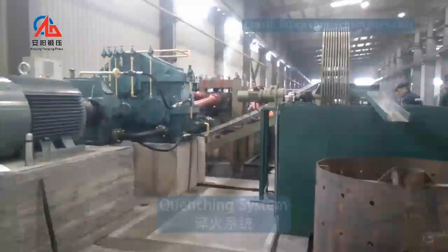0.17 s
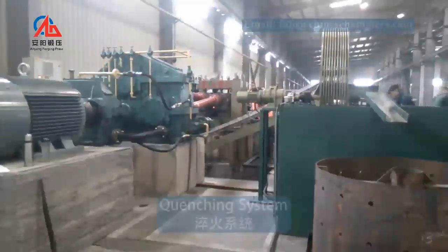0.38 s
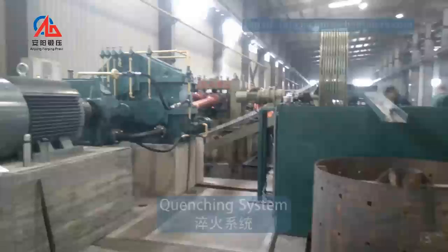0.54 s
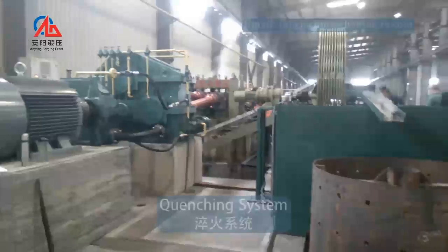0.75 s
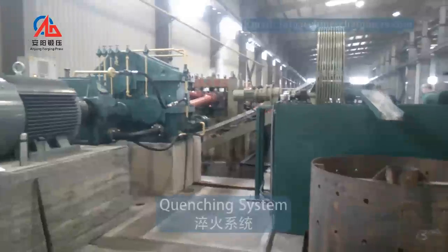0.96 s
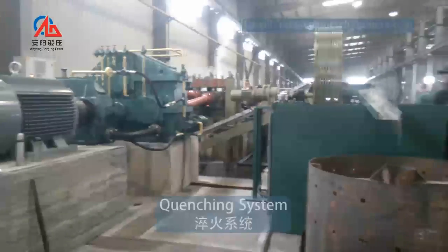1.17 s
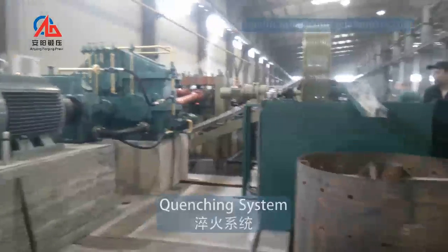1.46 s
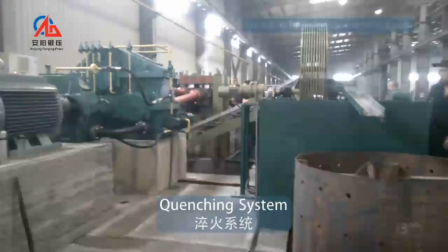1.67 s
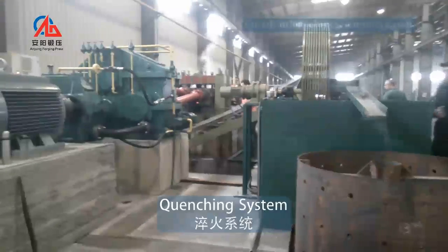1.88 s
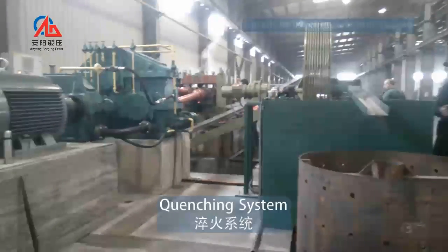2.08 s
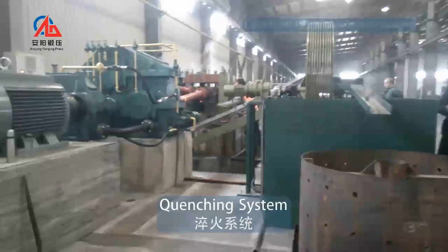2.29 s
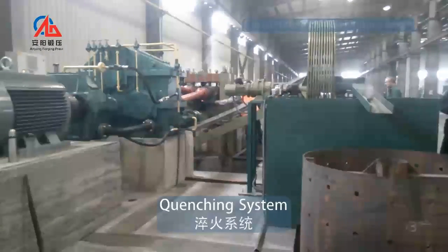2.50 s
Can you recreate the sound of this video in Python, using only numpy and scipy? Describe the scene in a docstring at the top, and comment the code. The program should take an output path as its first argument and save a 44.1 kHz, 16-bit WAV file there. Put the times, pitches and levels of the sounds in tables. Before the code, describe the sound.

Hard steel pieces clank and rattle in a sheet-metal chute, dense at first, sparser mid-way, then busy again, over constant motor and gearbox drone and recurring roller rumble in a big hall; the microphone's level ducks under loud hits.

```python
"""A big factory hall with a rolling mill: motors and gearbox drone, the rolls rumble about every 0.8 s.
Steel pieces clank and rattle in the chutes, whose wall bangs; a larger steel part rings near 960 Hz.
Drone, rumble and thumps are shaped noise, with singing tones for the frame of the rolls; each clank
is a noise crack, scattered partials of sheet steel and struck modes.
A gain control ducks the whole mix under every loud clank, and the level dips once, briefly."""
import sys
import numpy as np
from scipy import signal
from scipy.fft import rfft, irfft, next_fast_len
from scipy.io import wavfile
from scipy.ndimage import uniform_filter1d, minimum_filter1d, map_coordinates

SR = 44100
rng = np.random.default_rng(int(sys.argv[2]) if len(sys.argv) > 2 else 0)


def file_out(sig):
    """Save sig as 16-bit WAV at sys.argv[1]."""
    # one column per channel
    cols = np.atleast_2d(sig).T
    # limit, then scale
    lim = np.clip(cols, -1, 1)
    pcm = np.round(lim * 32767).astype(np.int16)
    wavfile.write(sys.argv[1], SR, pcm)


N = 116865  # length in samples

# Colour of the motor and gearbox drone. Each row: frequency in Hz, relative level in dB per Hz.
DRONE_COLOUR = [(25, -4), (45, -5), (85, -6.5), (112, -7), (145, 2.5), (190, -6.5), (240, 6), (330, 9),
                (480, 2), (750, 2), (1100, -1.5), (1500, -15), (3000, -30.5), (6000, -56)]
# Steady lines of the drive, under the swell. Each row: frequency in Hz, level in dB.
DRIVE_LINES = [(112, -54.5), (140, -55), (283, -57.5), (361, -56), (748, -57), (960, -47), (2783, -57)]
# Colour of the hall's far clatter and hiss. Each row: frequency in Hz, relative level in dB per Hz.
HALL_COLOUR = [(500, -37.5), (1500, 10.5), (2600, 11), (3400, 5.5), (4300, 5), (4850, 9.5), (5600, 3.5),
               (7000, 0.5), (9700, -4.5)]
# Slow swell of everything in the drive. Each row: time in seconds, gain in dB.
SWELL_CURVE = [(0, 7), (.45, 2), (0.849, 7), (1.151, 2.5), (1.322, 2), (1.44, -1.5), (1.652, 12.5),
               (1.95, 2), (2.298, -0.5), (2.65, 2)]
# Roll strokes and the weaker shudders between them.
# Each row: start in seconds, level in dB, hold in seconds, pitch of the frame in Hz.
ROLL_STROKES = [(-.15, -31.5, 0.33, 260), (0.688, -23, 0.23, 300.9), (1.029, -30, 0.047, 350),
                (1.511, -24, 0.26, 288.3), (2.003, -32, 0.03, 423), (2.309, -27, 0.29, 282)]
# Colour of a stroke's body. Each row: frequency in Hz, relative level in dB per Hz.
RUMBLE_COLOUR = [(100, -37.5), (190, -23), (230, -6.5), (350, -3.5), (490, -11), (620, -9), (790, -6),
                 (1050, -22), (1400, -23), (3000, -59)]
# Steel pieces landing. Each row: start in seconds, crash level in dB, ring level in dB, treble tilt in dB,
# rise in seconds, main pitch of the piece in Hz, its second mode in Hz.
LANDINGS = [(0, -33.5, -25, 12, 0.036, 4850, 6000), (0.0759, -13, -19, 5.5, 0.0005, 4700, 1493),
            (0.102, -32, -16, -5, .005, 6130, 5570), (.135, -22.5, -21, -9, 0.0069, 4640, 4336),
            (.163, -36.5, -23, 12.5, 0.008, 5400, 5270), (.191, -25.5, -17, -8.5, 0.0021, 4820, 3649),
            (.241, -26.5, -32, -5, .008, 4340, 3652), (0.289, -35.5, -35, 17, 0.028, 4470, 2621),
            (0.316, -22.5, -20, -11.5, 0.0087, 4785, 3641), (.435, -17, -6.5, 4, 0.019, 4847, 3649),
            (.483, -21, -22, -7, 0.011, 4791, 3655), (0.542, -21.5, -21, 1.5, 0.024, 4160, 5062),
            (0.678, -54.5, -29, -11.5, 0.0085, 4270, 2600), (.776, -48, -34, 4, 0.0093, 4950, 4800),
            (1.117, -30.5, -31, -4, 0.011, 4740, 4793), (1.198, -25.5, -29, 0.5, .012, 4769, 4901),
            (1.244, -35, -30, 0, 0.016, 4780, 1507), (1.462, -41, -29.5, 0.5, 0.024, 4766, 4620),
            (1.485, -16.5, -15, 3.5, 0.0011, 4880, 5307), (1.513, -27.5, -24.5, 0, 0.013, 5213, 5307),
            (1.634, -26.5, -22.5, -1, 0.013, 6140, 2312), (1.677, -31, -24, 0, 0.0036, 4770, 4993),
            (1.742, -23.5, -20.5, 10, 0.0044, 5330, 4850), (1.785, -29.5, -19, -2.5, 0.022, 4860, 3924),
            (1.85, -37, -34.5, -1.5, 0.0075, 5110, 2600), (1.972, -20, -14.5, 1.5, .01, 4800, 4137),
            (2.015, -26, -28.5, -14.5, 0.0091, 2456, 1660), (2.059, -29, -25.5, -2.5, 0.018, 4980, 4783),
            (2.156, -16.5, -15, 8, 0.0051, 4720, 5547), (2.178, -18.5, -23, -2, 0.0067, 4680, 4710),
            (2.209, -31, -23, -10, 0.0076, 4960, 5170), (2.25, -28.5, -41, -3, 0.0029, 4380, 5649),
            (2.529, -33.5, -38, -4, 0.013, 4830, 3650)]
# Colour of the chute's crash. Each row: frequency in Hz, relative level in dB per Hz.
CRASH_COLOUR = [(80, -50), (250, -51.5), (700, -4.5), (1100, -2), (1700, 4.5), (2100, 0), (2550, 3),
                (3050, -1), (3700, 2.5), (4400, 2.5), (5300, 0), (6300, -1), (7200, -9.5), (9700, -13)]
# Extra colour of the crack, over that of the crash. Each row: frequency in Hz, relative gain in dB.
CRACK_COLOUR = [(600, 11.5), (1500, 4.5), (2600, -9), (5000, 1.5)]
# Struck modes of the chute. Each row: frequency in Hz, relative level in dB.
CHUTE_MODES = [(1663, 9), (1790, -1), (2330, 4), (2460, -4.5), (2600, -0.5), (2783, 4.5), (3460, 0),
               (3651, 3.5), (4120, 10), (4419, 9.5), (5307, 4.5), (5546, -7), (5892, -1.5), (6654, -7)]
# Modes of a steel piece. Each row: ratio to its main pitch, relative level in dB.
PIECE_MODES = [(.978, -12), (1, 0), (1.021, -12), (1.04, -10), (1.1, -15)]
# Bangs of the chute's wall. Each row: start in seconds, level in dB, pitch in Hz.
WALL_BANGS = [(.076, -11, 1450), (1.4855, -19, 1790)]
# Dull thumps of the gearbox. Each row: start in seconds, level in dB.
GEARBOX_THUMPS = [(0.371, -52), (0.675, -36.5), (.985, -30), (1.069, -32), (1.141, -34.5), (1.588, -33),
                  (1.691, -33), (1.819, -37), (2.372, -38), (2.44, -31)]
# Colour of a thump's body. Each row: frequency in Hz, relative level in dB per Hz.
THUMP_COLOUR = [(25, -2), (70, -10.5), (130, 3.5), (180, -0.5), (300, -0.5), (800, -51)]
# Tolls of the large part. Each row: start in seconds, level in dB, attack in seconds,
# T60 in seconds, chatter from 0 to 1.
TOLL_STRIKES = [(.427, -24, 0.0022, 2.01, 0.47), (.53, -22.5, 0.029, 0.15, 1),
                (0.634, -30.5, 0.009, 0.39, 1), (0.959, -21.5, 0.041, 0.16, 0.25),
                (2.1459, -27.5, 0.0016, 0.29, .2), (2.205, -24, 0.0052, 0.81, 1)]
# Other modes of the large part, stirred by chatter. Each row: frequency in Hz, relative level in dB.
CHATTER_MODES = [(897, -7), (950, 2.5), (972, 6.5), (1015, 1.5), (1080, -10.5)]
# Left-right likeness of the noise. Each row: frequency in Hz, coherence.
COHERENCE = [(50, 0.94), (130, 0.99), (280, 0.9), (550, 0.64), (1100, 0.09), (2300, 0.013), (4800, 0.31),
             (9000, .05)]
# Stereo balance of the whole mix. Each row: frequency in Hz, left over right in dB.
STEREO_BALANCE = [(50, -1.5), (140, 3), (350, 2.5), (700, 3), (1000, 5), (1600, 6), (2600, 0.5), (3700, -2),
                  (4800, -6), (5600, 2.5), (6500, -1.5), (8000, 12.5), (9500, 11)]

DRONE_DB, HALL_DB = -35.5, -40.5  # under the swell
SURGE_DB, HALL_PATCHY_DB = 1.3, 5.5  # depths of random level changes
STROKE_ATTACK_S, STROKE_T60_S = 0.0055, 0.34
FRAME_DB, FRAME_UPPER_DB, FRAME_UPPER_HZ = -2, -7.5, 361  # upper tone relative to the lower
FRAME_BUILD_S, FRAME_WANDER_RAD = 0.083, .9
CRACK_DB, CRACK_T60_S, CRASH_T60_S = 2, 0.047, 0.35
CHUTE_DB, CHUTE_T60_S = -12, 0.47
PIECE_T60_S, SECOND_MODE_DB, PIECE_ECHO_DB = .22, -4, -4
ECHO_DB, ECHO_T60_S = -7, 0.57
RATTLE_DB, CLATTER_PATCHY_DB = 1.1, 3.8  # depths of random level changes
UNEVEN_DB, UNEVEN_SPACING_HZ = 4, 130  # random bumps in the crash colour
PARTIAL_SPACING_HZ, PARTIAL_SHARE = 90, .75  # mean spacing; share of power
MODE_WIDTH_HZ, MODE_SCATTER_DB, DETUNE_RATIO = 30, 2.5, .001
SLAM_T60_S, SLAM_WIDTH_HZ = 0.057, 170
THUMP_RISE_S = 0.0086
TOLL_HZ, TOLL_WANDER_RAD, FLUTTER_DB = 961, .55, 2.3
LEFT_LEAD_S = 0.00018
LIMIT_DB, GAIN_ATTACK_S, RECOVER_DB_PER_S = -24, 0.0018, 159.5
SETTLE_S, OVERSHOOT_DB = .006, 1.8
DIP_START_S, DIP_END_S, DIP_DB = .612, .631, -12.5
TOP_HZ = 9800


def amp(db):
    """Decibels to gain."""
    return 10 ** (np.asarray(db) / 20)


def unit(x):
    """Scale to rms 1."""
    return x / np.sqrt(np.mean(x ** 2) + 1e-20)


def along(points, hz):
    """Read (Hz, value) points on a log frequency axis."""
    f, v = np.transpose(points)
    return np.interp(np.log(hz + 1), np.log(f + 1), v)


def since(start):
    """Seconds after a moment, zero before it."""
    return np.maximum(np.arange(N) / SR - start, 0)


def fade(t, t60):
    """Exponential decay by 60 dB in t60 seconds."""
    return np.exp(-np.log(1000) * t / t60)


def chance(position):
    """A smooth random curve with one knot per unit of position."""
    return map_coordinates(rng.standard_normal(2048), [position], mode="wrap")


def wobble(rate):
    """A smooth random curve in time, rate knots a second."""
    return chance(np.arange(N) * rate / SR)


def filtered(x, response):
    """Shape x by a response of frequency."""
    m = next_fast_len(N + 8192)  # padding keeps the end from wrapping onto the start
    hz = np.fft.rfftfreq(m, 1 / SR)
    return irfft(rfft(x, m) * response(hz), m)[..., :N]


def diffuse(response, size=N):
    """Stereo noise of rms 1 with a given response; mid and side are mixed to set the coherence."""
    m = next_fast_len(size, real=True)
    hz = np.fft.rfftfreq(m, 1 / SR)
    turn = np.arccos(np.clip(along(COHERENCE, hz), -1, 1)) / 2
    spectra = rfft(rng.standard_normal((2, m))) * response(hz)
    mid, side = irfft(spectra * [np.cos(turn), np.sin(turn)], m)[:, :size]
    return unit(np.array([mid + side, mid - side]))


def rush(spectrum):
    """Broad noise with a given colour."""
    return diffuse(lambda hz: amp(along(spectrum, hz)))


def resonances(modes, width_hz, size=N):
    """Narrow modes kept ringing by random excitation."""
    def peaks(hz):
        return sum(amp(db) / (1 + ((hz - f) / width_hz) ** 2) for f, db in modes)
    return diffuse(peaks, size)


def tone(hz, wander):
    """A resonance kept singing, its phase and strength drifting."""
    # a drift shared by both channels, plus a smaller one of each channel's own
    drift = wander * wobble(25.03) + 0.21 * np.array([wobble(6.8), wobble(25)])
    return unit(amp(FLUTTER_DB * wobble(40)) * np.sin(2 * np.pi * hz * since(0) + drift))


def patchy(x, depth_db):
    """Short random emphases of narrow bands, like many far-off rings."""
    z = signal.stft(x, nperseg=512)[2]
    field = rng.standard_normal(z.shape[1:])
    field = uniform_filter1d(field, size=2, axis=0)  # over neighbouring bands
    field = uniform_filter1d(field, size=10, axis=1)  # over time
    return unit(signal.istft(z * amp(depth_db * unit(field)), nperseg=512)[1][:, :N])


def drive():
    """Motors and gearbox drone as surging noise with wavering lines, over the patchy hiss of the hall."""
    drone = amp(DRONE_DB + SURGE_DB * wobble(15)) * rush(DRONE_COLOUR)
    hum_level = np.linalg.norm([amp(db) for hz, db in DRIVE_LINES])
    hum = hum_level * resonances(DRIVE_LINES, width_hz=2.4)
    hall = amp(HALL_DB + 0.16 * wobble(71)) * patchy(rush(HALL_COLOUR), HALL_PATCHY_DB)
    swell = amp(np.interp(since(0), *np.transpose(SWELL_CURVE)))
    return swell * (drone + hum + hall)


def rolls():
    """Each stroke swells, holds and dies away; two frame resonances build up under it into a growl."""
    out = np.zeros((2, N))
    for start, db, hold, hz in ROLL_STROKES:
        upper = amp(FRAME_UPPER_DB) * tone(FRAME_UPPER_HZ, FRAME_WANDER_RAD)
        frame = tone(hz, FRAME_WANDER_RAD) + upper
        frame *= np.minimum(since(start) / FRAME_BUILD_S, 1)
        attack = np.minimum(since(start) / STROKE_ATTACK_S, 1)
        shape = attack * fade(since(start + hold), STROKE_T60_S)
        level = amp(db + SURGE_DB * wobble(90))
        out += level * shape * (rush(RUMBLE_COLOUR) + amp(FRAME_DB) * frame)
    return out


def ring(modes, t):
    """Modes struck once, each at a fresh strength and with a different phase in the two channels."""
    out = np.zeros((2, len(t)))
    for hz, db in modes:
        phase = rng.uniform(0, 2 * np.pi) + rng.normal(0, 0.96, (2, 1))
        level = amp(db + rng.normal(0, MODE_SCATTER_DB))
        out += level * np.sin(2 * np.pi * hz * rng.normal(1, DETUNE_RATIO) * t + phase)
    return unit(out)


def plate(colour, size):
    """Sheet steel: many scattered partials of a given colour, with some noise between them."""
    def scattered(hz):
        return colour(hz) * (rng.random(len(hz)) < hz[1] / PARTIAL_SPACING_HZ)
    partials = diffuse(scattered, size)
    return np.sqrt(PARTIAL_SHARE) * partials + np.sqrt(1 - PARTIAL_SHARE) * diffuse(colour, size)


def clanks():
    """Each landing cracks in both channels alike, rings the piece and stirs the chute into uneven clatter."""
    out = np.zeros((2, 2, N + SR))  # blows and clatter, each in stereo
    size = 24000  # samples per landing
    t = np.arange(size) / SR
    echo = amp(ECHO_DB) * fade(t, ECHO_T60_S)
    crash_decay = np.hypot(fade(t, CRASH_T60_S), echo)
    for start, crash_db, ring_db, bright_db, rise, pitch, second_hz in LANDINGS:
        def colour(hz):
            tilt_db = along([(3500, 0), (6500, bright_db)], hz)
            bumps_db = UNEVEN_DB * chance(hz / UNEVEN_SPACING_HZ)
            return amp(along(CRASH_COLOUR, hz) + tilt_db + bumps_db)

        crack = diffuse(lambda hz: colour(hz) * amp(along(CRACK_COLOUR, hz)), size)[0]
        crack = amp(CRACK_DB) * fade(t, CRACK_T60_S) * crack
        crash = crash_decay * amp(RATTLE_DB * chance(170 * t)) * plate(colour, size)
        chute = amp(CHUTE_DB) * fade(t, CHUTE_T60_S) * ring(CHUTE_MODES, t)
        modes = [(ratio * pitch, db) for ratio, db in PIECE_MODES] + [(second_hz, SECOND_MODE_DB)]
        piece = fade(t, PIECE_T60_S) * ring(modes, t)
        piece += amp(PIECE_ECHO_DB) * echo * resonances(modes, MODE_WIDTH_HZ, size)

        blow = amp(crash_db) * crack + amp(ring_db) * piece
        clatter = amp(crash_db) * (crash + chute)
        onset = np.sin(np.pi / 2 * np.minimum(t / rise, 1)) ** 2
        first = max(round(start * SR), 0)
        out[..., first:first + size] += onset * np.array([blow, clatter])
    blows, clatter = out[..., :N]
    return blows + np.std(clatter) * patchy(clatter, CLATTER_PATCHY_DB)


def slams():
    """The chute's wall flexes: a broad resonance of noise dies fast, a short, full-bodied bang."""
    out = np.zeros(N)
    for start, db, hz in WALL_BANGS:
        shape = (since(start) > 0) * fade(since(start), SLAM_T60_S)
        out += amp(db) * shape * resonances([(hz, 0)], SLAM_WIDTH_HZ)[0]
    return out


def gearbox():
    """Soft low thumps of noise that swell and fade."""
    envelope = np.zeros(N)
    for start, db in GEARBOX_THUMPS:
        u = since(start) / THUMP_RISE_S
        envelope += amp(db) * u * np.exp(1 - u)  # peaks at 1 after the rise time
    return envelope * rush(THUMP_COLOUR)


def tolls():
    """A larger steel part rings on one note, blurred by other modes when it chatters."""
    out = np.zeros((2, N))
    for start, db, attack, t60, chatter in TOLL_STRIKES:
        note = np.sqrt(1 - chatter) * tone(TOLL_HZ, TOLL_WANDER_RAD)
        blur = np.sqrt(chatter) * resonances(CHATTER_MODES, MODE_WIDTH_HZ)
        shape = np.minimum(since(start) / attack, 1) * fade(since(start + attack), t60)
        out += amp(db) * shape * (note + blur)
    return out


def scene():
    """The mill reaches the left channel first; a balance by frequency then places the whole mix."""
    mill = drive() + rolls() + gearbox()
    # opposite phase slopes: the left is early and the right late, by half the lead each
    mill = filtered(mill, lambda hz: np.exp(np.outer([1j, -1j], np.pi * hz * LEFT_LEAD_S)))
    mix = mill + clanks() + slams() + tolls()
    return filtered(mix, lambda hz: amp(np.outer([.5, -.5], along(STEREO_BALANCE, hz))))


def record(dry):
    """Gain control that lets the first instant of a blow overshoot, one brief level dip, a band limit."""
    t = since(0)
    pole = np.exp(-1 / (GAIN_ATTACK_S * SR))
    power = signal.lfilter([1 - pole], [1, -pole], np.mean(dry ** 2, axis=0))
    over_db = np.maximum(10 * np.log10(power + 1e-12) - LIMIT_DB, 0)
    # the cut follows a blow up, then recovers along a straight line in dB
    recovered_db = RECOVER_DB_PER_S * t
    cut_db = np.maximum.accumulate(over_db + recovered_db) - recovered_db
    # it settles late, but never lags by more than the allowed overshoot
    lag = np.exp(-1 / (SETTLE_S * SR))
    settled_db = signal.lfilter([1 - lag], [1, -lag], cut_db)
    cut_db = np.maximum(settled_db, cut_db - OVERSHOOT_DB)
    gain_db = uniform_filter1d(minimum_filter1d(-cut_db, size=100), size=100)
    dip = uniform_filter1d(1. * ((t > DIP_START_S) & (t < DIP_END_S)), size=60)
    return filtered(dry * amp(gain_db + DIP_DB * dip), lambda hz: hz < TOP_HZ)


dry = scene()
out = record(dry)
file_out(out)
```